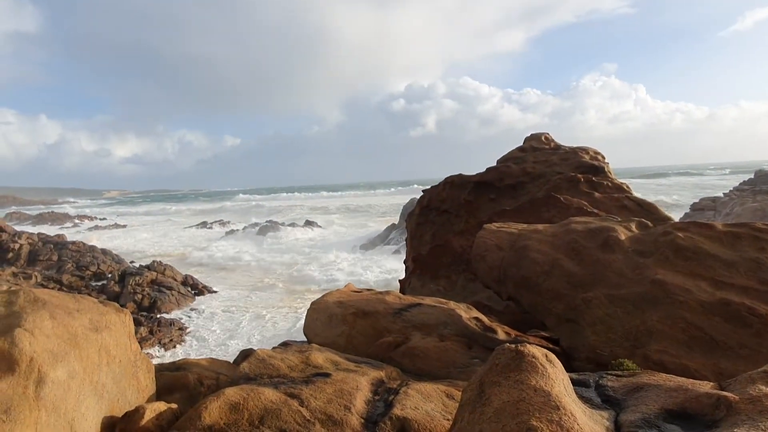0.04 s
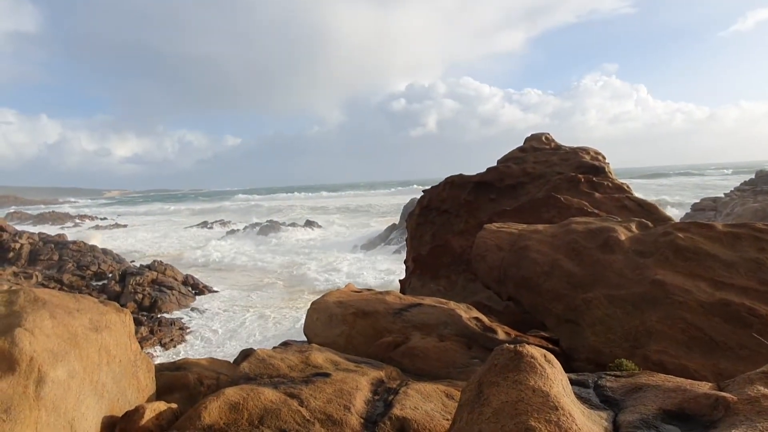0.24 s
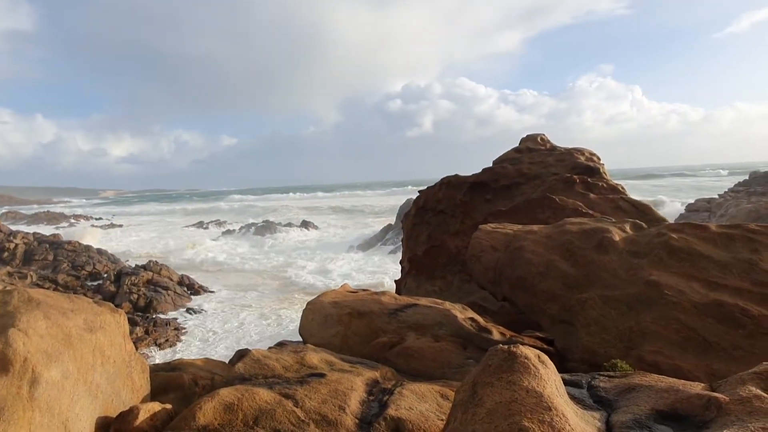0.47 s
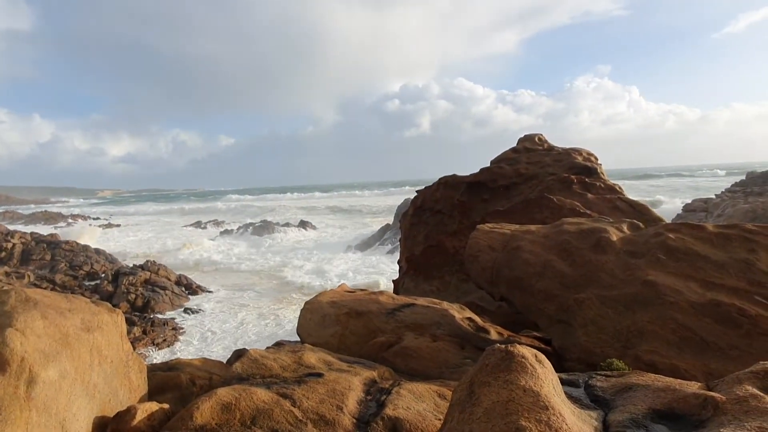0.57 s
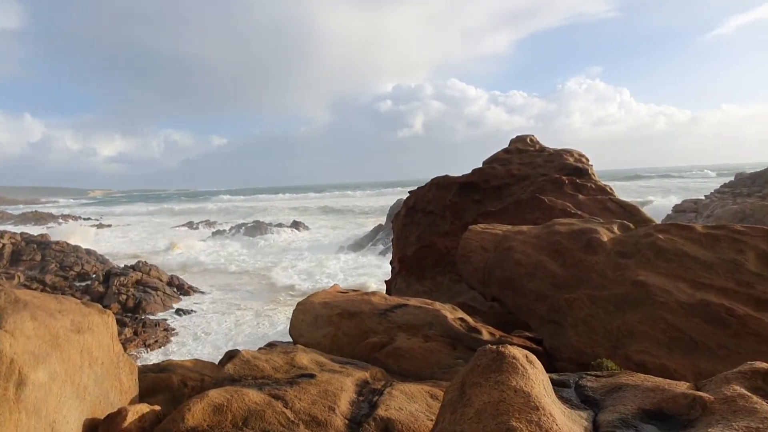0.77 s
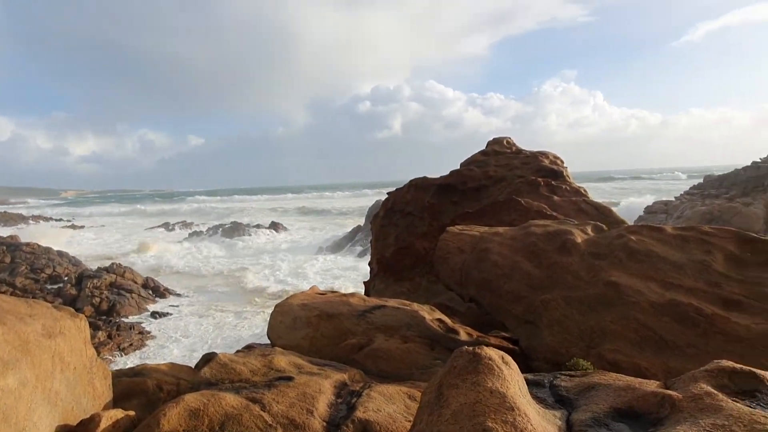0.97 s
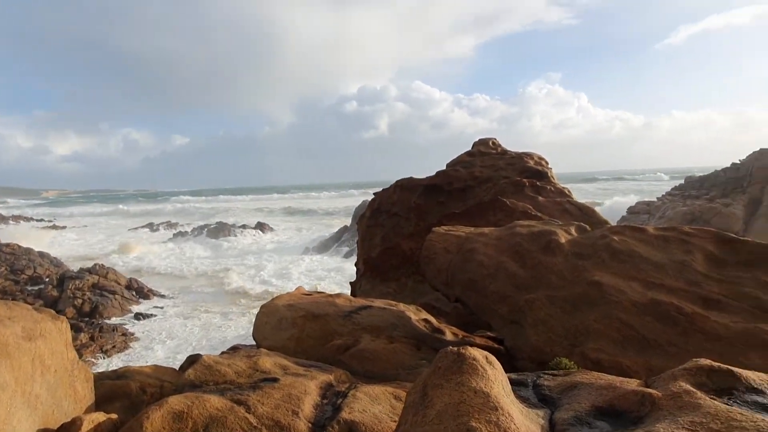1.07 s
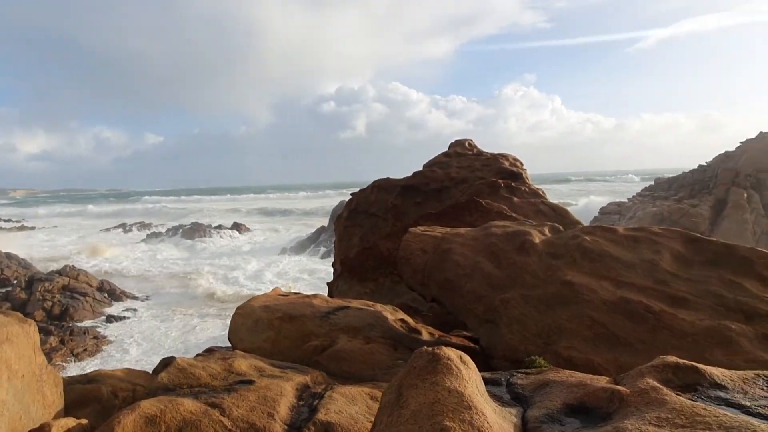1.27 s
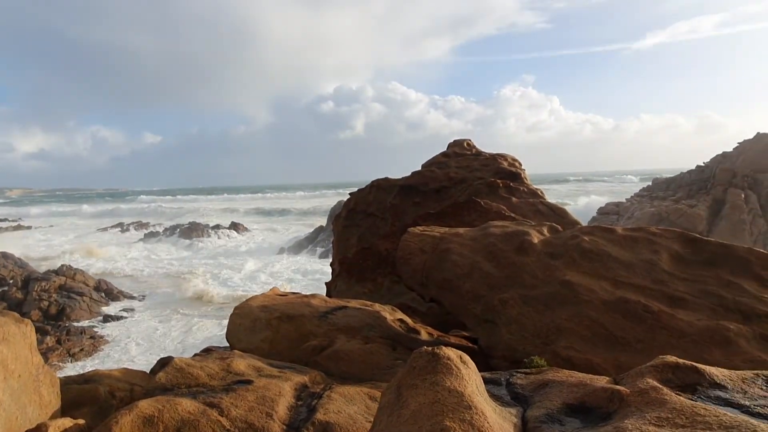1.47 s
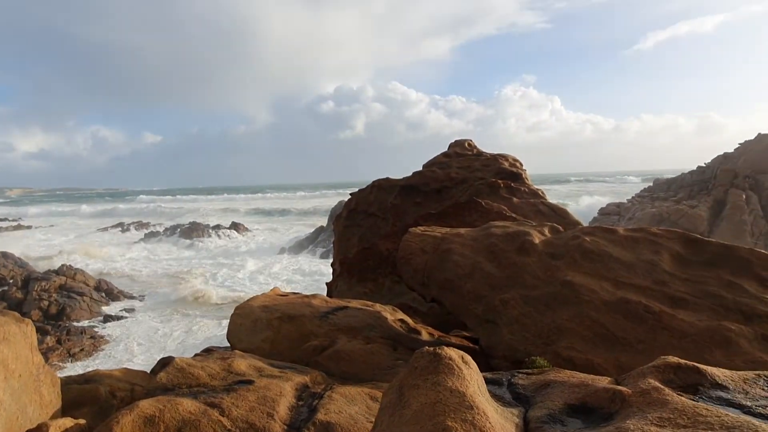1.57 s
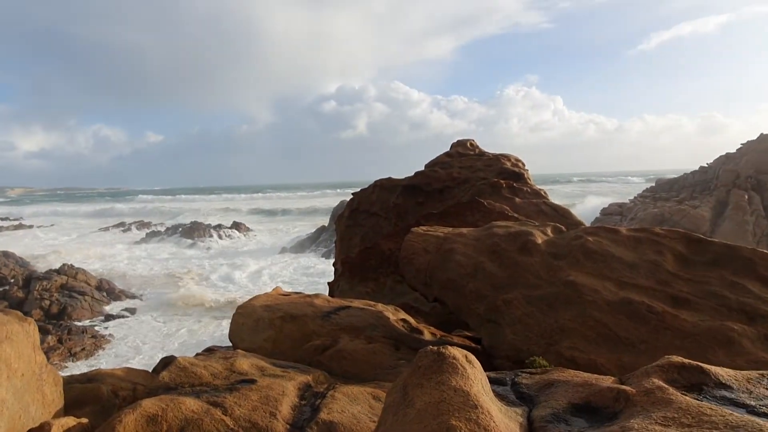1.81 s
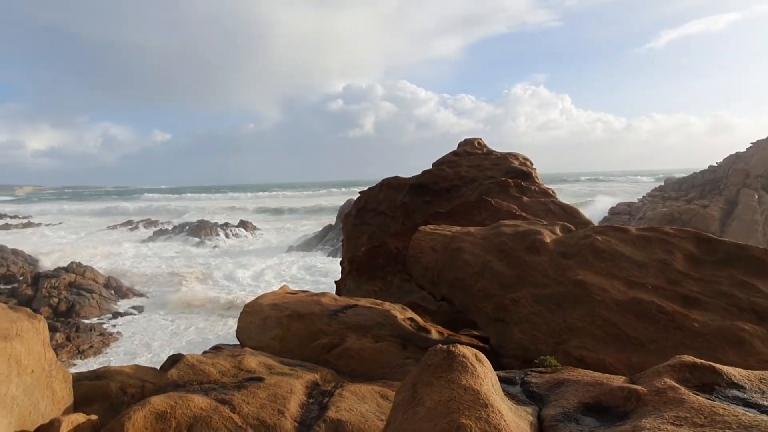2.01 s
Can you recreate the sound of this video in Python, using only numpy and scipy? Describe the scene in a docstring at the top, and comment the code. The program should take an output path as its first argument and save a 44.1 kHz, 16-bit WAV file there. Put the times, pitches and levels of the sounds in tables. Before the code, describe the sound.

Strong wind beats on an unshielded stereo microphone at a rocky shore, rasping mostly on the left, with bass thumps and sharp cracks in two hard gusts, while heavy surf washes steadily behind.

```python
"""Gusty wind beats on the two ports of a microphone while heavy surf churns on a rocky shore behind.
Eddies rasp across the ports, mostly the left one, and the largest growl: coloured noise in short swells.
Pressure buffets thump in the bass and the hardest gusts crack: low swells and very short noise swells.
Now and then the wind hoots or whistles on an edge (wavering sines), and spray or sand ticks on the casing.
The surf is a steady wash: noise whose level follows a slow curve and churns gently."""
import sys
import numpy as np
from scipy import signal
from scipy.fft import rfft, irfft, next_fast_len
from scipy.io import wavfile
from scipy.ndimage import uniform_filter1d

SR = 44100
rng = np.random.default_rng(int(sys.argv[2]) if len(sys.argv) > 2 else 0)


def store_pcm(level_fs):
    """Save levels as 16-bit WAV."""
    pcm = np.round(np.clip(level_fs, -1, 1) * 32767).astype(np.int16)
    wavfile.write(sys.argv[1], SR, np.atleast_2d(pcm).T)


N = 90404
TIME = np.arange(N) / SR   # seconds

# All levels in the tables come before the rounding of peaks in record().
# A "half length" runs from the top of a swell to where it has sunk by about 4 dB.


def from_db(db):
    """Turns decibels into a gain."""
    return 10 ** (np.asarray(db) / 20)


def rms_one(x):
    """Scales each channel to an average strength (rms) of 1."""
    return x / np.sqrt(np.mean(x ** 2, axis=-1, keepdims=True) + 1e-20)


def drift(hz):
    """Random wandering for each port, with rms 1: noise smoothed twice so that little is left above hz."""
    r = np.exp(-2 * np.pi * hz / SR)
    raw = rng.standard_normal((2, N + SR))
    smooth = signal.lfilter([1], [1, -2 * r, r * r], raw)
    return rms_one(smooth[:, SR:])   # skip the first second, while the filter settles


def noise(spectrum, likeness):
    """Stereo noise of rms 1 with a given colour; likeness 0 is unrelated sides, 1 is equal sides."""
    table_hz, table_db = np.transpose(spectrum)
    size = next_fast_len(N, True)
    hz = np.arange(size // 2 + 1) * SR / size
    gain = from_db(np.interp(np.log(hz + 1), np.log(table_hz), table_db))
    white = rng.standard_normal((2, size))
    mid, side = irfft(rfft(white) * gain, size)[:, :N]
    left_right_sign = np.array([[1], [-1]])
    return rms_one(np.sqrt(1 + likeness) * mid + np.sqrt(1 - likeness) * side * left_right_sign)


def evened(x, span_s):
    """Holds the level steady over spans longer than span_s and keeps the finer grain."""
    size = max(int(span_s * SR), 2)
    power = uniform_filter1d(uniform_filter1d(x ** 2, size), size)
    return x / np.sqrt(np.abs(power) + 1e-12)


SWELL_EDGE = 2.2   # 2 is a bell, more gives steeper sides


def swell(s, half_s):
    """A rounded rise and fall that peaks at 1 at time s."""
    away = np.abs(TIME - s) / half_s
    out = np.zeros(N)
    near = away < 4
    out[near] = np.exp(-.5 * away[near] ** SWELL_EDGE)
    return out


def swells(rows):
    """Left and right gain of overlapping swells, summed in power."""
    power = 0
    for s, half_s, left, right in rows:
        power = power + (from_db([[left], [right]]) * swell(s, half_s)) ** 2
    return np.sqrt(power)


# eddies, before the two gains below: t/s, half length t/s, left level/dB, right level/dB,
# sizzle against rasp level/dB
EDDY_TABLE = [(0.013, 0.006, -31, -68, -7.5), (0.07, 0.013, -30, -41, -5.5), (0.112, 0.0093, -25, -34, -3),
              (0.129, 0.0046, -23.5, -25, -6.5), (0.154, 0.0091, -17.5, -24.5, -10.5),
              (0.176, 0.0084, -20, -23, -12.5), (0.208, 0.014, -23.5, -26, -11.5),
              (0.236, 0.0072, -28.5, -24.5, -18), (0.258, 0.012, -25, -37, -10.5),
              (0.295, 0.0091, -29.5, -56, -6.5), (0.319, 0.0048, -24, -29.5, -9.5),
              (0.339, 0.012, -32.5, -59, -3.5), (0.376, 0.025, -35, -43, -9.5),
              (0.426, 0.019, -32.5, -42.5, -4), (0.526, 0.013, -29.5, -32.5, -14.5),
              (0.594, 0.014, -32, -55, -5.5), (0.642, 0.01, -31.5, -63, -8.5),
              (0.703, 0.0056, -23.5, -26.5, -20), (0.726, 0.014, -24, -28, -13),
              (0.772, 0.016, -29, -38.5, -15), (0.799, 0.0065, -29.5, -46, -3.5),
              (0.841, 0.017, -26, -55, -7), (0.89, 0.0074, -24.5, -33, -19), (0.945, 0.023, -31, -56, -8.5),
              (0.973, 0.032, -37, -36.5, -10), (1.024, 0.014, -27, -29.5, -15),
              (1.054, 0.0091, -26, -31.5, -14.5), (1.102, 0.0037, -28.5, -57, -6),
              (1.144, 0.019, -29, -38, -2.5), (1.214, 0.011, -28, -35.5, -14),
              (1.251, 0.011, -27, -32, -31), (1.277, 0.02, -33.5, -61, -1.5), (1.31, 0.015, -23.5, -56, -4),
              (1.355, 0.011, -29, -38, -3.5), (1.409, 0.018, -31, -63, -2.5), (1.451, 0.03, -30, -62, -6),
              (1.497, 0.0058, -28.5, -32.5, -6.5), (1.518, 0.0093, -21.5, -33, -7),
              (1.532, 0.011, -23.5, -36, -1), (1.578, 0.014, -27.5, -28, -5),
              (1.595, 0.0086, -15.5, -18, -9), (1.612, 0.0084, -20, -21, -3),
              (1.645, 0.0092, -25, -23.5, -15), (1.665, 0.0051, -17, -19.5, -15),
              (1.691, 0.018, -20.5, -27, -6), (1.765, 0.0087, -22, -26, -34),
              (1.785, 0.052, -32.5, -48, -11.5), (1.894, 0.0058, -30, -61, -13.5),
              (2.006, 0.0091, -30, -42, -8.5), (2.035, 0.0081, -28, -33, -9)]
# colour of the rasp and of the brighter sizzle: f/Hz, relative level/dB per Hz
RASP_COLOUR = [(60, -7), (180, -7), (300, -2), (420, 4), (750, 3), (1300, 6), (1800, -8.5), (2600, -14.5),
               (4000, -19), (8000, -85)]
SIZZLE_COLOUR = [(800, -11), (1600, 8), (2300, 2), (3400, -0.5), (4300, -12), (6500, -14), (7800, -33.5),
                 (11500, -32), (16000, -50)]
RASP_DB, SIZZLE_DB = 1, 6   # gains of the two parts
RASP_LIKENESS = 0.013   # shared with the cracks
# spread and speed before evening out
FLUTTER_DB, FLUTTER_HZ = 3.5, 75   # the flow flaps within an eddy
CRACKLE_DB, CRACKLE_HZ = 3, 273   # and breaks up finer still


def eddies():
    """Each eddy tears over the ports: a rasp and a brighter sizzle, fluttering together."""
    flutter_db = FLUTTER_DB * drift(FLUTTER_HZ) + CRACKLE_DB * drift(CRACKLE_HZ)
    rasp = evened(noise(RASP_COLOUR, RASP_LIKENESS) * from_db(flutter_db), span_s=0.0094)
    sizzle_db = flutter_db + 2.46 * drift(200)   # the treble also flickers by itself
    sizzle = evened(noise(SIZZLE_COLOUR, RASP_LIKENESS) * from_db(sizzle_db), span_s=0.031)
    rasp_rows = [row[:4] for row in EDDY_TABLE]
    # the sizzle is 2.5 dB weaker on the right
    sizzle_rows = [(s, half_s, left + tilt, right + tilt - 2.5)
                   for s, half_s, left, right, tilt in EDDY_TABLE]
    rasp_part = from_db(RASP_DB) * rasp * swells(rasp_rows)
    sizzle_part = from_db(SIZZLE_DB) * sizzle * swells(sizzle_rows)
    return rasp_part + sizzle_part


# large eddies: t/s, half length t/s, left level/dB, right level/dB
GROWL_TABLE = [(.235, 0.047, -32.5, -36), (.724, 0.0084, -19, -24), (.772, 0.032, -31.5, -33.5),
               (.845, 0.018, -28, -28), (1.0, 0.032, -30.5, -35), (1.62, 0.059, -28.5, -28.5)]
# colour of a growl, in the low middle: f/Hz, relative level/dB per Hz
GROWL_COLOUR = [(60, -59), (130, 14), (180, 14), (310, 11), (450, 5), (900, -45.5)]


def growls():
    """The largest eddies tear at a lower pitch."""
    flutter_db = 4 * drift(80)
    tearing = evened(noise(GROWL_COLOUR, likeness=.3) * from_db(flutter_db), span_s=.02)
    return swells(GROWL_TABLE) * tearing


# pressure buffets: t/s, half length t/s, left level/dB, right level/dB
BUFFET_TABLE = [(0.005, 0.0069, -27, -24), (0.098, 0.0076, -33, -20), (0.135, 0.0057, -22, -10.5),
                (0.157, 0.011, -7.5, -11), (0.203, 0.016, -20, -17), (0.276, 0.017, -25.5, -28),
                (0.334, 0.017, -24, -21), (0.516, 0.021, -29.5, -27), (0.573, 0.011, -28, -26.5),
                (0.654, 0.052, -45, -41), (0.72, 0.0067, -29.5, -46), (0.781, 0.059, -34, -51),
                (0.832, 0.015, -29.5, -20.5), (0.876, 0.026, -24.5, -24), (0.951, 0.013, -23.5, -22),
                (1.004, 0.016, -33.5, -36), (1.066, 0.021, -31, -49), (1.159, 0.032, -69, -26.5),
                (1.22, 0.014, -26.5, -23), (1.309, 0.047, -67, -29.5), (1.382, 0.0076, -34, -22.5),
                (1.44, 0.012, -59, -30), (1.535, 0.034, -57, -22.5), (1.572, 0.013, -12.5, -11),
                (1.613, 0.015, -8.5, -10.5), (1.662, 0.023, -13, -15.5), (1.698, 0.017, -17.5, -16),
                (1.775, 0.021, -27, -22.5), (1.822, 0.031, -31.5, -40), (1.965, 0.071, -42.5, -40)]
# colour of the thumps and the rumble: f/Hz, relative level/dB per Hz
RUMBLE_COLOUR = [(15, -15), (35, -14), (60, -0.5), (82, 0.5), (115, -7.5), (180, -14), (280, -21),
                 (500, -37.5), (1200, -74)]
RUMBLE_LIKENESS = 0.34
STEADY_RUMBLE_DB = (-79, -36)   # left, right


def buffets():
    """Lumps of pressure push on the diaphragms over a nearly steady low rumble."""
    thumps = swells(BUFFET_TABLE) * evened(noise(RUMBLE_COLOUR, RUMBLE_LIKENESS), span_s=0.021)
    rumble_db = np.array(STEADY_RUMBLE_DB)[:, None] + 0.52 * drift(54)
    return thumps + from_db(rumble_db) * noise(RUMBLE_COLOUR, RUMBLE_LIKENESS)


# cracks at the ports: t/s, left level/dB, right level/dB
CRACK_TABLE = [(0.151, -23, -31), (0.168, -27, -20), (0.21, -18.5, -27), (0.334, -23.5, -35),
               (0.725, -30, -17.5), (1.208, -36, -34), (1.245, -48, -27), (1.532, -17, -46),
               (1.553, -42, -18), (1.578, -33, -13.5), (1.595, -28, -22), (1.604, -19, -11),
               (1.613, -14, -18.5), (1.652, -21, -16), (1.671, -26, -27), (1.691, -15.5, -30),
               (1.764, -35, -24.5)]
# colour of a crack: f/Hz, relative level/dB per Hz
CRACK_COLOUR = [(100, -12), (500, 2.5), (1300, 5.5), (3500, -16), (6500, -26.5), (9000, -43)]
CRACK_HALF_S = 0.002


def cracks():
    """The hardest gusts slap a port: separate cracks a few milliseconds long."""
    rows = [(s, CRACK_HALF_S, left, right) for s, left, right in CRACK_TABLE]
    grain = evened(noise(CRACK_COLOUR, RASP_LIKENESS), span_s=CRACK_HALF_S)
    return swells(rows) * grain


# brief edge tones, from hoots to whistles: t/s, half length t/s, pitch f/Hz, rise f/Hz per s,
# left level/dB, right level/dB (before the flicker)
WHISTLE_TABLE = [(0.133, 0.0031, 1018, -2, -10, -15), (1.015, 0.0047, 593, 2.5, -21.5, -26),
                 (1.018, 0.13, 1051, 3, -35.5, -39), (1.52, 0.0052, 595, -1, -14.5, -45),
                 (1.553, 0.005, 3820, -4, -19.5, -42), (1.563, 0.0058, 4380, 37998.5, -23, -49),
                 (1.607, 0.006, 1340, -3, -10.5, -24), (1.648, 0.0017, 4140, 259995, -20.5, -21)]
WHISTLE_WANDER = 0.032   # spread of the pitch, as a share of it
WHISTLE_WANDER_HZ = 420   # speed of the pitch wander and the flicker
WHISTLE_FLICKER_DB = 4.0   # spread of the level


def whistles():
    """The flow locks on to an edge for a moment and sounds a ragged, unsteady tone."""
    out = 0
    wander = 1 + WHISTLE_WANDER * drift(WHISTLE_WANDER_HZ)
    for s, half_s, hz, rise, left, right in WHISTLE_TABLE:
        pitch = hz * wander + rise * (TIME - s)
        tone = np.sin(2 * np.pi * np.cumsum(pitch, axis=1) / SR)
        out = out + from_db([[left], [right]]) * swell(s, half_s) * tone
    flicker = rms_one(from_db(WHISTLE_FLICKER_DB * drift(WHISTLE_WANDER_HZ)))
    return out * flicker


# specks hitting the casing, before the gains below: t/s, starting level/dB, left minus right level/dB
SPECK_TABLE = [(0.09, -44, 0), (0.111, -42.5, 10), (.157, -39, 9), (0.172, -50, 16), (0.208, -48, 4),
               (0.332, -53, -3), (0.413, -47.5, 8), (0.437, -43.5, 7), (0.916, -42.5, 0),
               (1.039, -46.5, -6), (1.071, -37.5, 4.5), (1.135, -48, 8), (1.258, -40.5, 6),
               (1.3147, -45, 5), (1.399, -52, 10), (1.6145, -44, 4), (1.689, -43, 14)]
SPECK_DB, SPECK_S = 5.5, 0.0014   # gain of all ticks; time to fade to about a third
SPECK_LOW_HZ, SPECK_HIGH_HZ, SPECK_RING_DB = 2940, 6100, 13.5   # the casing rings in this band


def specks():
    """Ticks of noise that start at once and fade within milliseconds, with a short ring of the casing."""
    strength = 0
    for s, db, pan in SPECK_TABLE:
        fade = (TIME >= s) * np.exp(-np.abs(TIME - s) / SPECK_S)
        strength = strength + from_db([[db + pan / 2], [db - pan / 2]]) * fade
    ticks = from_db(SPECK_DB) * strength * rng.standard_normal((2, N))
    band = signal.butter(2, [SPECK_LOW_HZ, SPECK_HIGH_HZ], "band", fs=SR, output="sos")
    return ticks + from_db(SPECK_RING_DB) * signal.sosfilt(band, ticks)


# surf, before the port levels and the churning: t/s, level/dB
SURF_CURVE = [(0, -36), (.3, -33.5), (.47, -34.5), (.8, -31.5), (1.2, -36.5), (1.55, -31.5), (1.75, -36),
              (1.9, -37), (2.05, -36)]
# moments when the left port is turned down and lets through less of the wash; the surf itself goes on:
# t/s, half length t/s, cut level/dB (negative lets through more)
LEFT_PORT_CUTS = [(0.023, 0.016, 9), (0.45, 0.013, 9), (0.687, 0.016, 6), (1.644, 0.012, -1),
                  (1.744, 0.022, 9)]
# colour of the wash: f/Hz, relative level/dB per Hz
SURF_COLOUR = [(30, -45), (150, 10.5), (400, -2.5), (800, -0.5), (1150, 0), (1700, -3), (3300, -4),
               (4200, -13), (6400, -15), (7800, -27.5), (11500, -24.5), (16000, -37)]
SURF_PORT_DB = (-7.5, -4)   # left, right
SURF_LIKENESS = 0.018


def surf():
    """The wash of many breakers is steady noise, gently churning."""
    level_db = np.interp(TIME, *np.transpose(SURF_CURVE)) + np.array(SURF_PORT_DB)[:, None]
    for s, half_s, cut_db in LEFT_PORT_CUTS:
        level_db[0] -= cut_db * swell(s, half_s)
    churn_db = 2.6 * drift(16.7)
    return from_db(level_db + churn_db) * noise(SURF_COLOUR, SURF_LIKENESS)


def scene():
    """Wind on the microphone in front, surf behind."""
    wind = eddies() + growls() + buffets() + cracks() + whistles()
    return wind + specks() + surf()


CUTOFF_HZ = 15850


def record(dry):
    """Rounds the peaks softly, then cuts the top steeply."""
    rounded = 1.407 * np.tanh(dry / 1.624)
    top_cut = signal.ellip(12, .1, 80, CUTOFF_HZ, fs=SR, output="sos")
    return signal.sosfilt(top_cut, rounded)


dry = scene()
out = record(dry)
store_pcm(out)
```